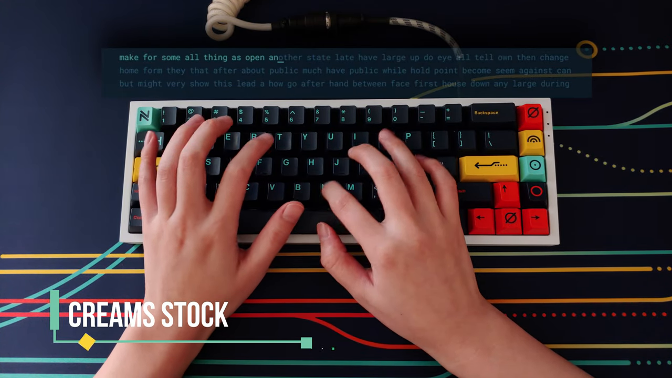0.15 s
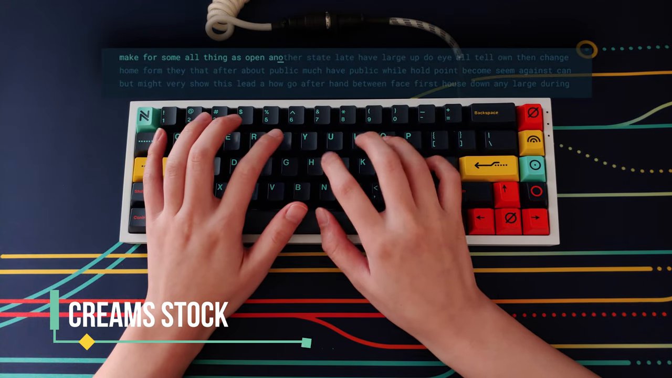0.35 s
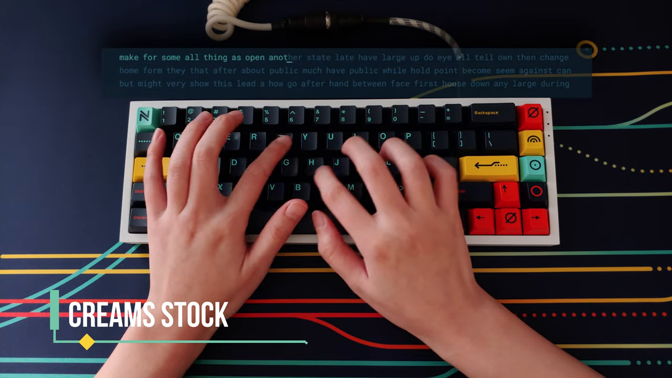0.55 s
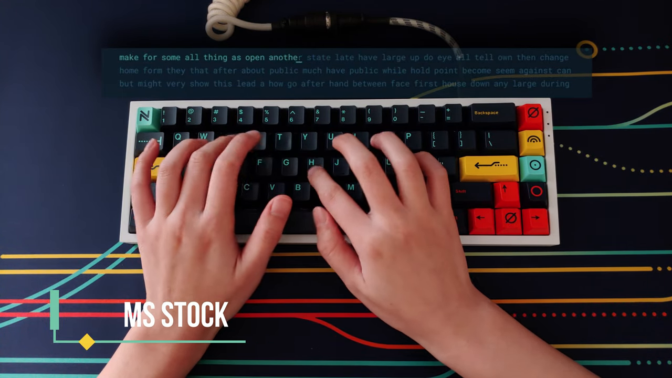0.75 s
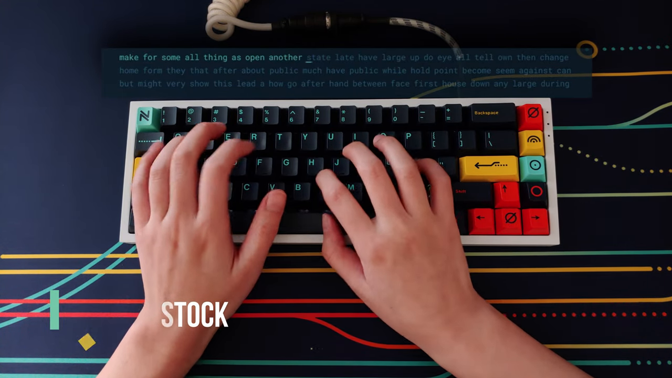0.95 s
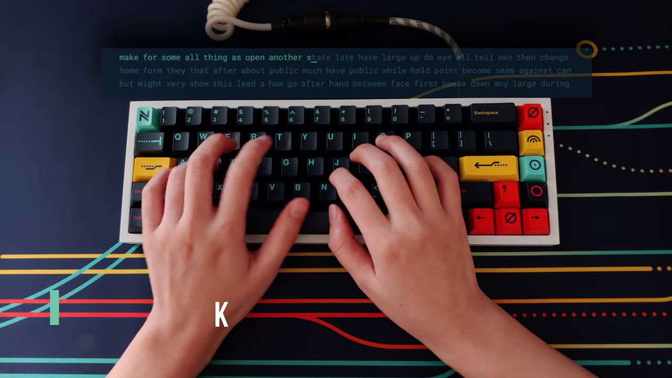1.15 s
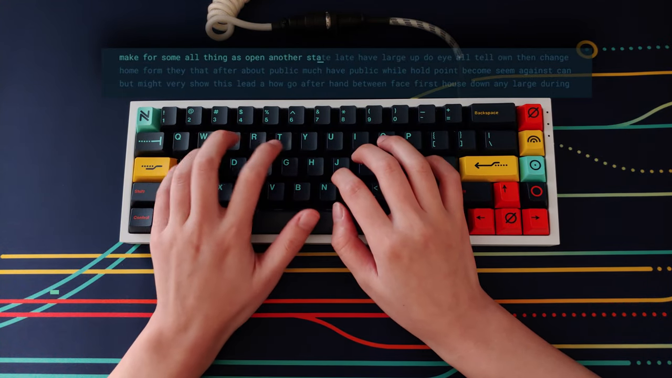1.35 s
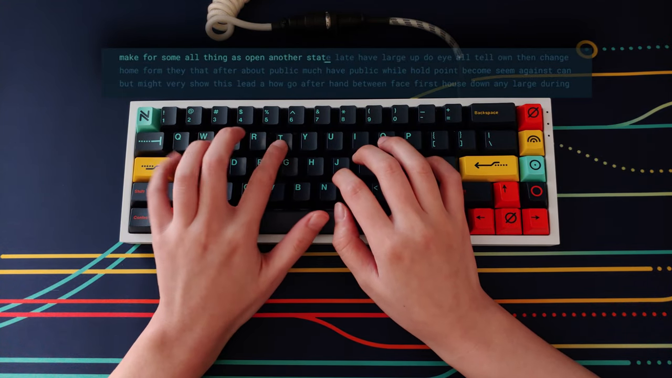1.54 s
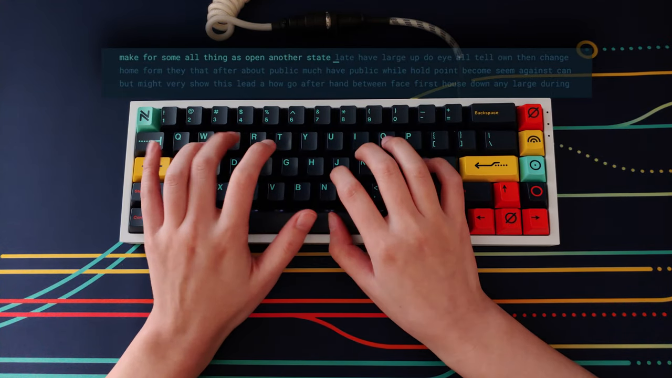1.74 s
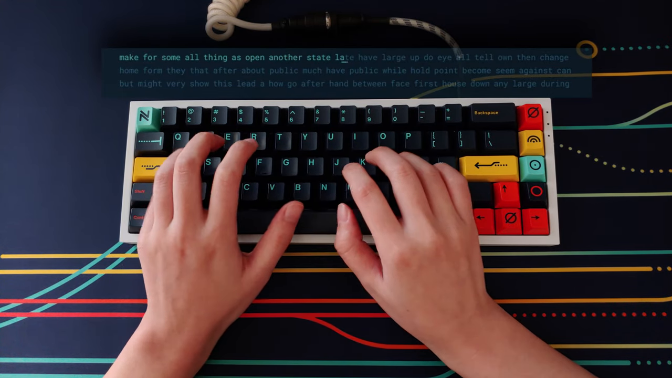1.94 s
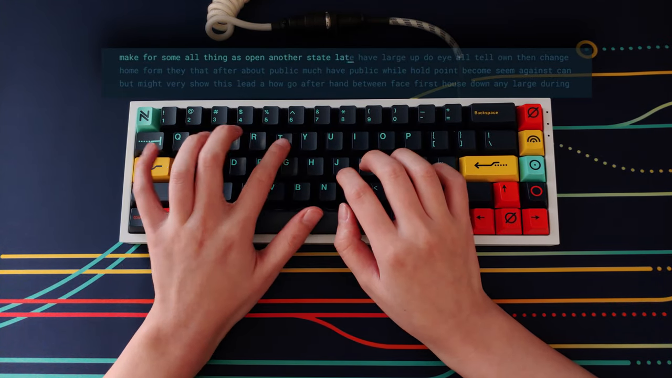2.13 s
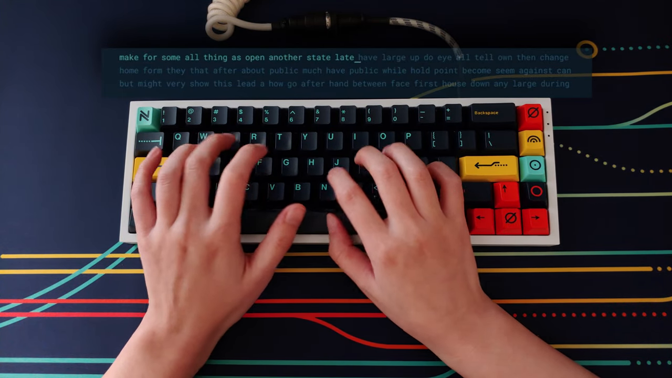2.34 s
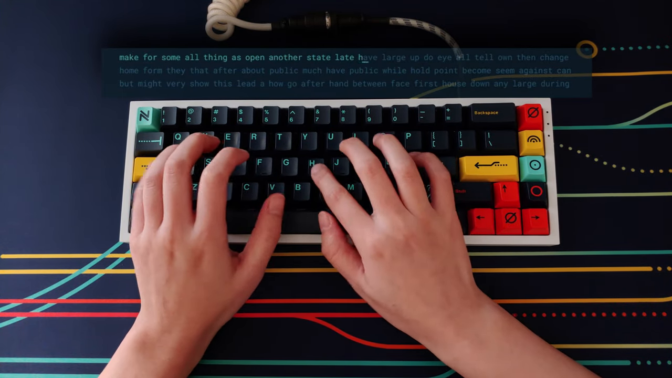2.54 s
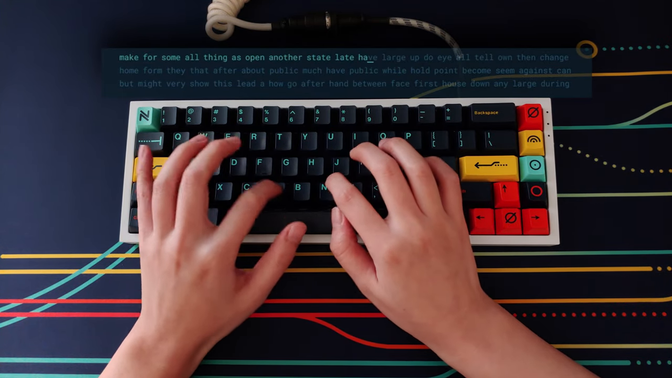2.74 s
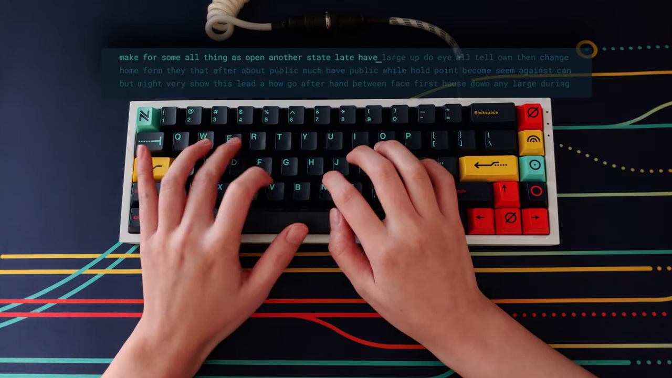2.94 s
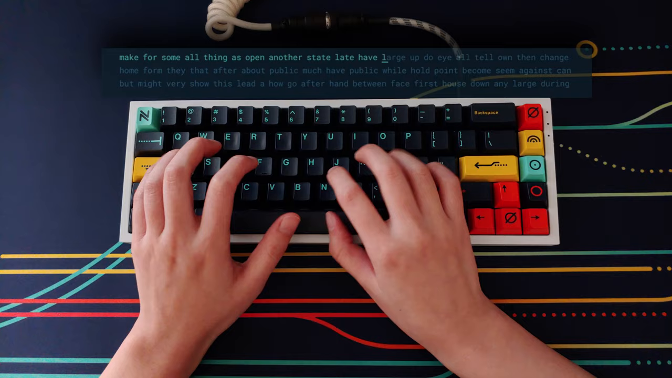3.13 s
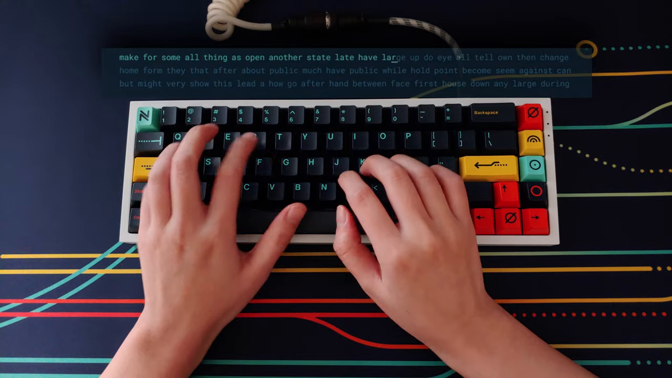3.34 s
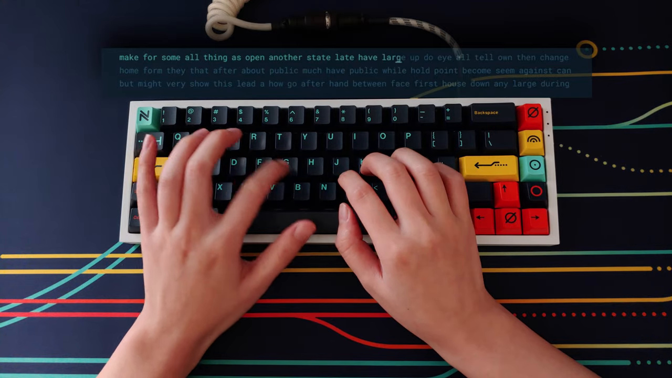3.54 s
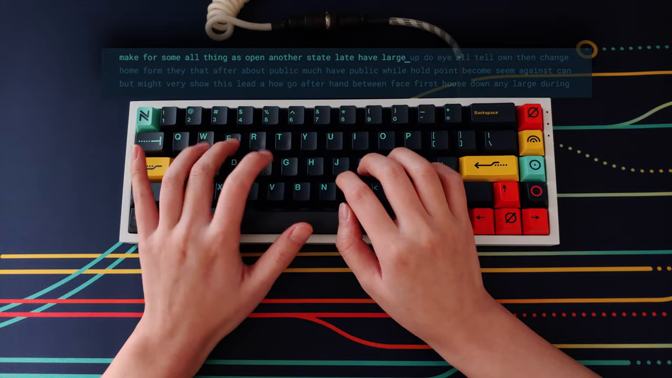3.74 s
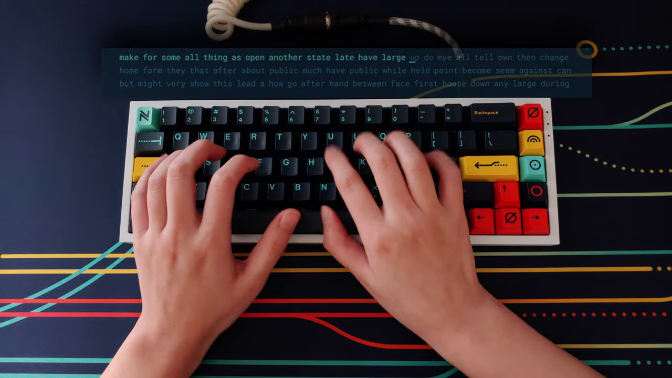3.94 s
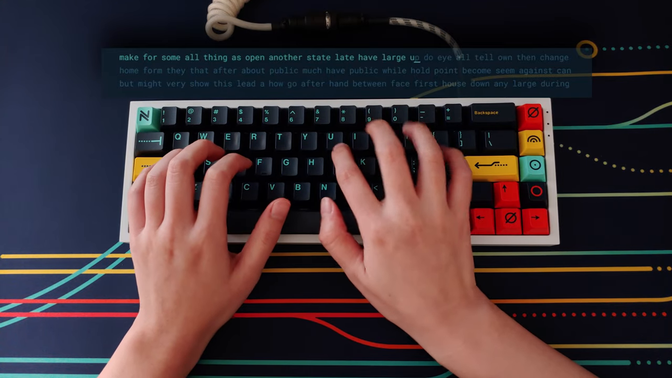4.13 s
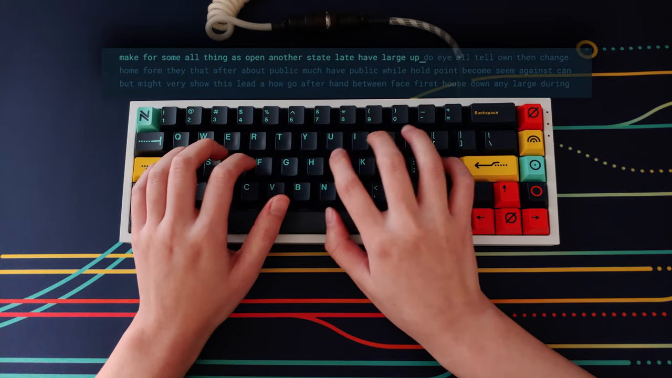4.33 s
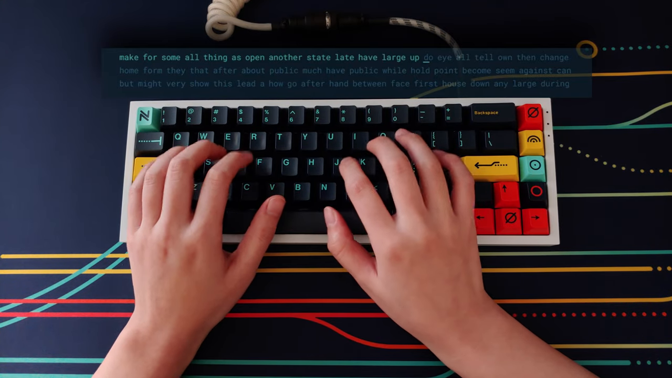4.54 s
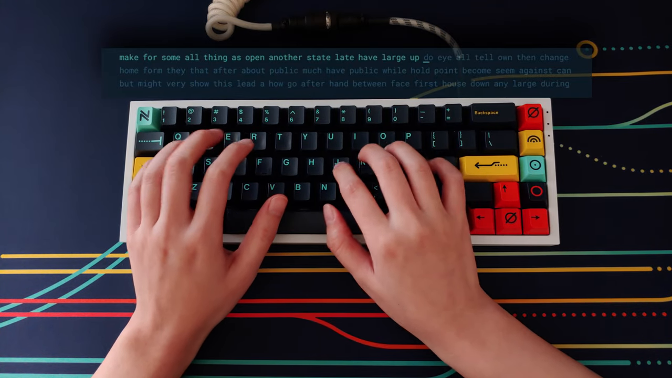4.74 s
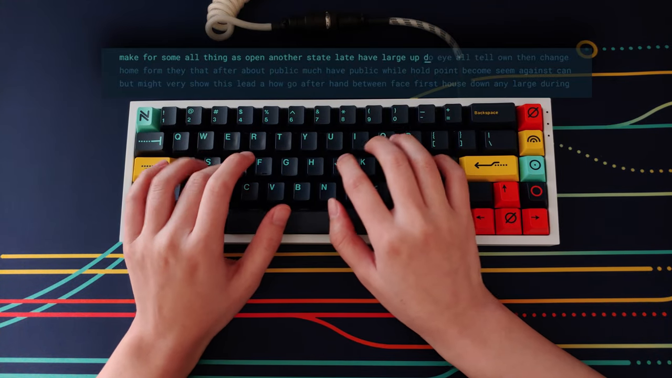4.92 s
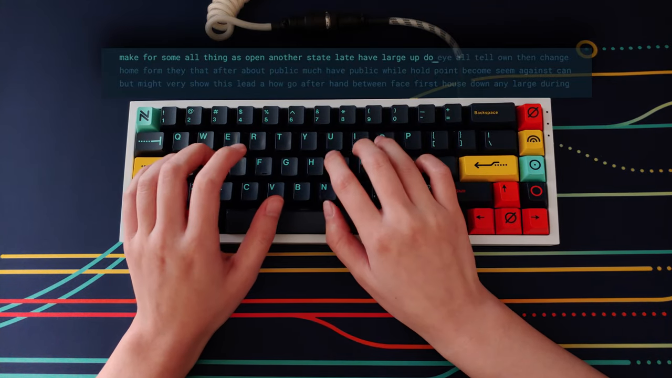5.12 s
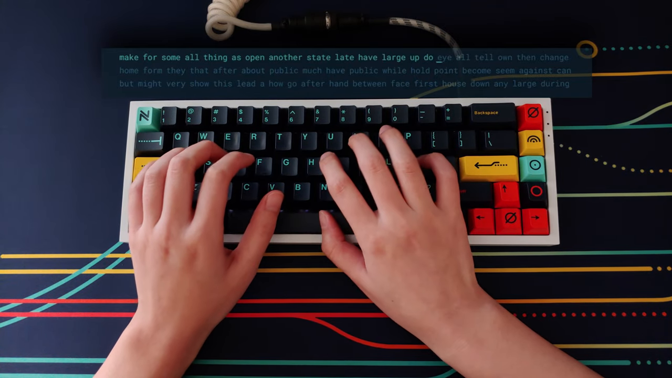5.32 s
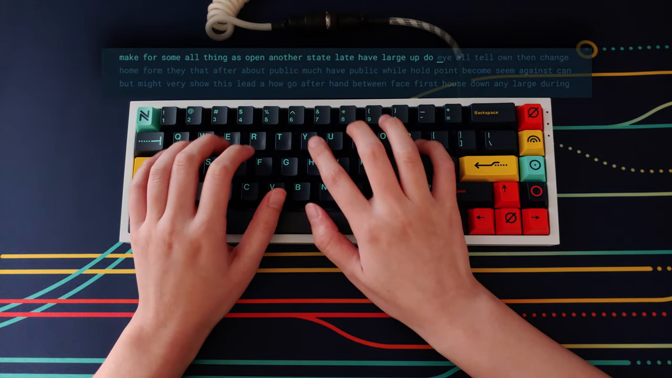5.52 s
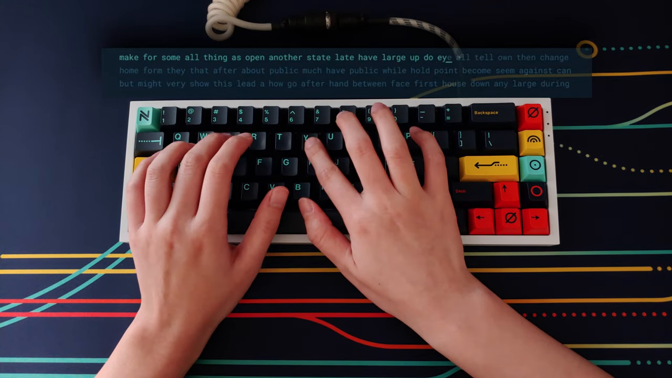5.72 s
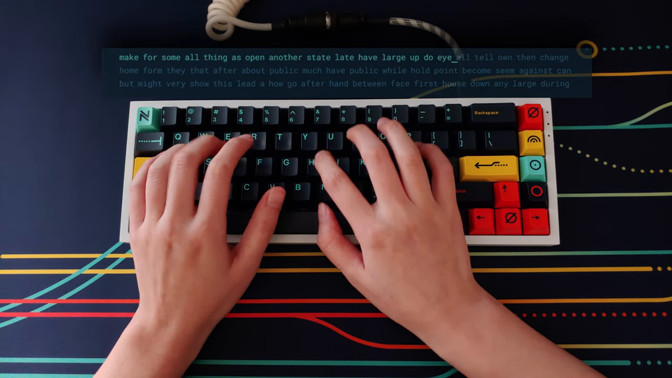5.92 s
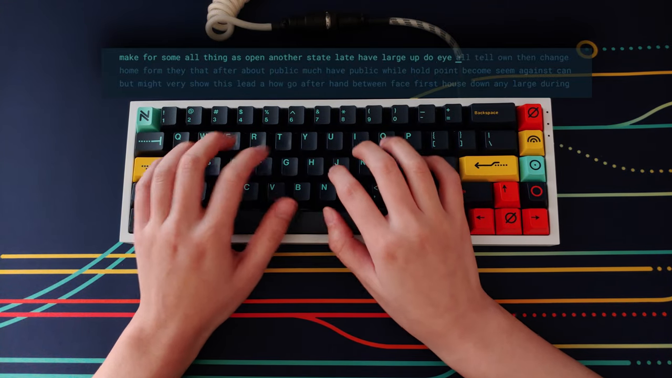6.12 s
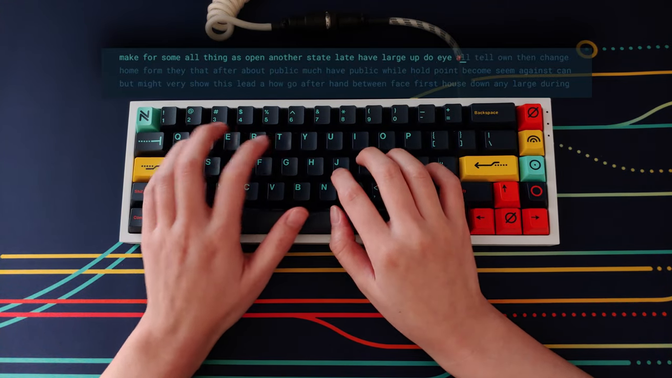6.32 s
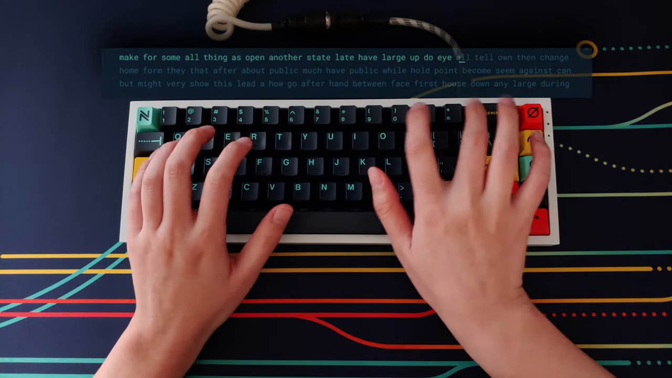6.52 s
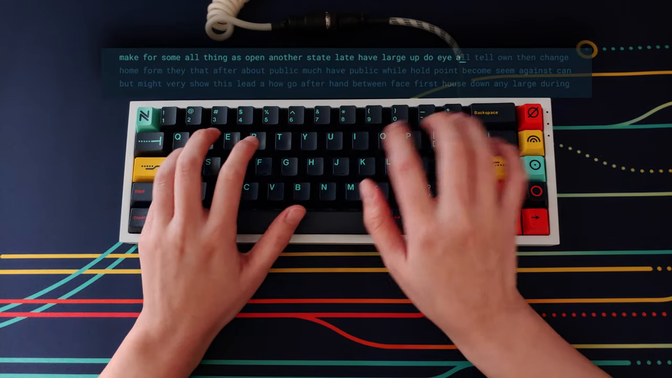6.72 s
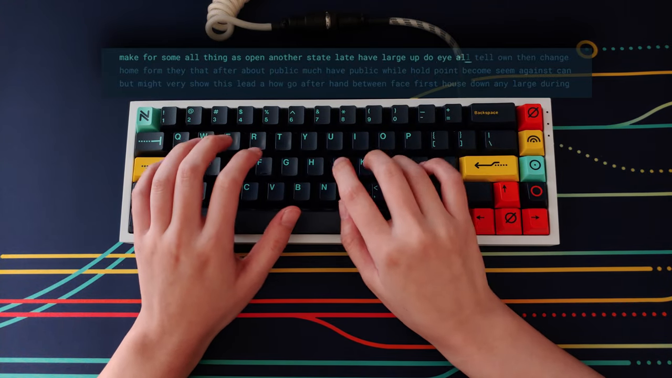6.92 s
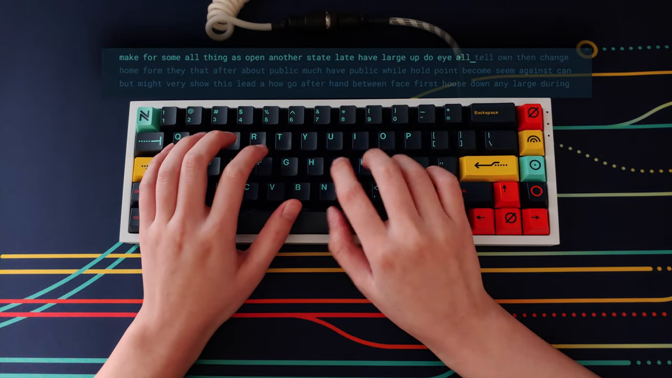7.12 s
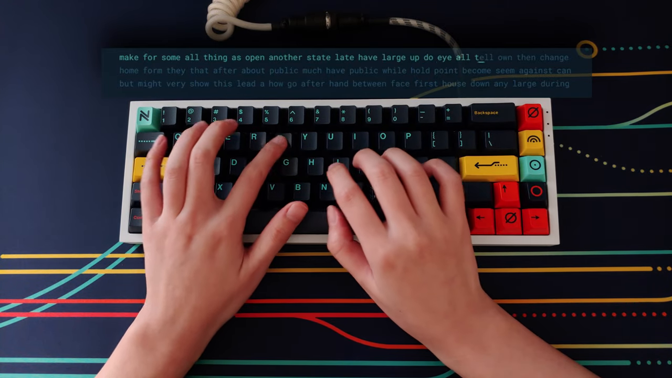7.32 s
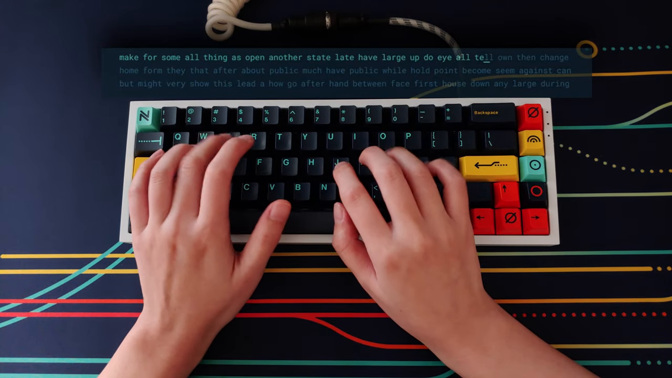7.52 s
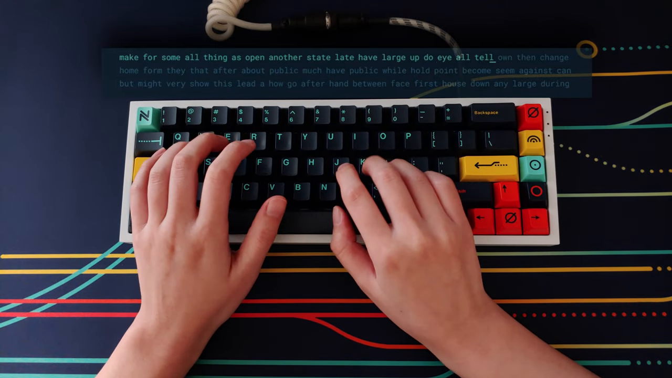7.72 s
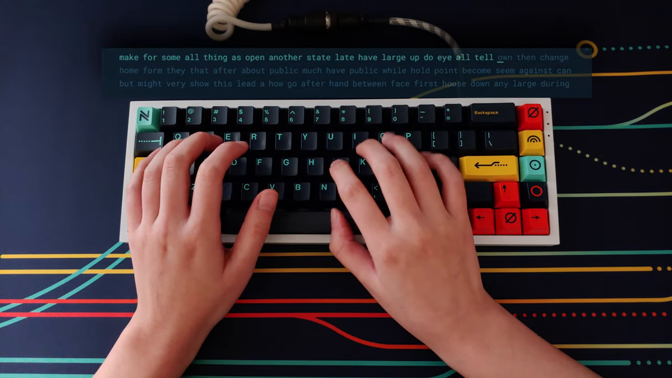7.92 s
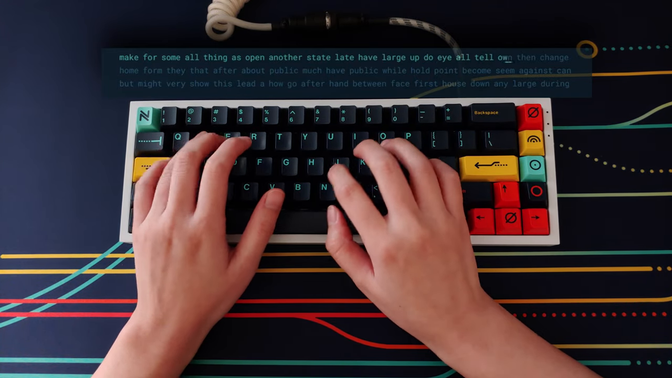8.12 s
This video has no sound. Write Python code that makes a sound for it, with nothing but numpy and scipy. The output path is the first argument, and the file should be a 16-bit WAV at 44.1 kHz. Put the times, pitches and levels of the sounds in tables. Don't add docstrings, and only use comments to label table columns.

```python
import sys
import numpy as np
from scipy import signal
from scipy.fft import rfft, irfft, next_fast_len
from scipy.io import wavfile
from scipy.ndimage import uniform_filter1d

SR = 44100
rng = np.random.default_rng(int(sys.argv[2]) if len(sys.argv) > 2 else 0)


def wav_out(sig):
    wavfile.write(sys.argv[1], SR, np.round(np.clip(np.atleast_2d(sig).T, -1, 1) * 32767).astype(np.int16))


def nominal_scale(level):
    x = np.asarray(level, float) / 20
    return 10 ** x


N = 359856


def evened(x):
    return x / np.sqrt(np.mean(x ** 2) + 1e-20)


def read(points, hz):
    f, value = np.transpose(points)
    return np.interp(np.log(hz + 1), np.log(f + 1), value)


def add(mix, s, sound):
    part = mix[round(s * SR):][:len(sound)]
    part += sound[:len(part)]


def lowpassed_noise(cutoff_hz):
    return evened(signal.sosfilt(signal.butter(2, cutoff_hz, fs=SR, output="sos"), rng.standard_normal(N)))


def bandpassed(order, band_hz):
    return signal.butter(order, band_hz, "bandpass", fs=SR, output="sos")


def coloured(points):
    size = next_fast_len(N)
    hz = np.fft.rfftfreq(size, 1 / SR)
    spectrum = rfft(rng.standard_normal(size)) * nominal_scale(read(points, hz))
    return evened(irfft(spectrum, size)[:N])


def smoothed_patches(shape, across, along):
    field = uniform_filter1d(rng.standard_normal(shape), across, axis=-2)
    return evened(uniform_filter1d(field, along, axis=-1))


# f/Hz, spectral density level/dB
DESK_SPECTRUM = [(8, -4.5), (22, 0), (38, 6.5), (53, -30.5), (69, -12.5), (95, -21.5), (170, -26.5),
                 (600, -47)]
# t/s, level/dB
DESK_LEVEL = [
    [(0.0, -46), (0.54, -59.5)],
    [(0.76, -46), (3.74, -46.5), (4.52, -51)],
    [(5.0, -66.5), (5.044, -45), (5.38, -58.5)],
    [(5.68, -50), (5.8, -55.5), (8.16, -47.5)],
]


def desk():
    s, db = np.concatenate(DESK_LEVEL).T
    lean = uniform_filter1d(rng.standard_normal(N), 5000)
    lean_db = 1.0 * evened(uniform_filter1d(lean, 5000))
    return coloured(DESK_SPECTRUM) * nominal_scale(np.interp(np.arange(N) / SR, s, db) + lean_db)


# f/Hz, T60/s
ROOM_DECAY = [(400, 0.15), (1400, 0.3), (9000, 0.12), (14000, 0.23)]


def room(x):
    blur_share, blur_hz = 0.28, 453
    t_s, out = np.arange(N) / SR, np.zeros(N)
    mid = signal.sosfiltfilt(bandpassed(2, (900, 14000)), x)
    blur = lowpassed_noise(blur_hz)
    x = x - mid + mid * (np.sqrt(1 - blur_share) + np.sqrt(blur_share) * blur)
    for k in range(3):
        echoes = np.zeros(SR // 2)
        at = np.arange(200, SR // 2 - 20, 20) + rng.integers(0, 20, (SR // 2 - 201) // 20)
        echoes[at] = rng.choice([-1., 1.], len(at))
        hz, t, z = signal.stft(echoes, SR, nperseg=256)
        decay_db = -60 * t / read(ROOM_DECAY, hz)[:, None]
        tail = signal.istft(z * nominal_scale(decay_db), SR, nperseg=256)[1]
        turn = np.cos(2 * np.pi * (4 * t_s + k / 3))
        out += signal.fftconvolve(x * turn, tail / np.linalg.norm(tail))[:N]
    return out


def dipped(x):
    dip_hz, width_hz, depth_db = 5600, 700, -9
    hz = np.fft.rfftfreq(N, 1 / SR)
    return irfft(rfft(x) * nominal_scale(depth_db * np.exp(-((hz - dip_hz) / width_hz) ** 2)), N)


# f/Hz, spectral density level/dB
SCRATCH_SPECTRUM = [(600, -39), (900, -9), (1440, 0.5), (2220, -6), (2790, -6), (9900, -19), (10900, -31.5),
                    (16000, -57)]
# t/s, duration/s, level/dB, squeak f/Hz
SLOW_SLIDES = [(0.739, 0.1, -48.5, 2830), (0.875, 0.027, -40.5, 5470), (1.134, 0.014, -47.5, 9300),
               (1.237, 0.028, -50, 9200), (1.379, 0.021, -55, 8700), (2.486, 0.028, -53.5, 3380),
               (2.552, 0.029, -51, 6800), (3.184, 0.018, -51.5, 4700), (3.394, 0.014, -45, 3340),
               (3.984, 0.036, -54, 4830), (4.076, 0.027, -49, 3300), (4.235, 0.053, -43.5, 1370),
               (4.492, 0.017, -58, 3550), (5.343, 0.03, -58, 7460), (5.662, 0.084, -53.5, 2740),
               (5.763, 0.032, -48.5, 2650), (6.006, 0.046, -49.5, 4500), (6.103, 0.025, -57.5, 3490),
               (6.683, 0.021, -66, 4500), (6.754, 0.065, -45, 2750), (7.326, 0.045, -52.5, 3600),
               (7.473, 0.018, -44, 3030), (7.872, 0.044, -49.5, 3180)]


def stems(hits):
    patchy_db, squeak_share = 7.5, 1.4
    settle_db, settle_t60_s = -18, 0.21
    hz, t, z = signal.stft(coloured(SCRATCH_SPECTRUM), SR, nperseg=256)
    patches_db = patchy_db * smoothed_patches(z.shape, 4, 9)
    scratch = evened(signal.istft(z * nominal_scale(patches_db), SR, nperseg=256)[1][:N])
    travel, slides, settle = np.zeros((3, N))
    swell = np.hanning(1600)[:800] ** 2
    fade_db = -60 * np.arange(SR // 5) / SR / settle_t60_s
    for s, _, keycap_db, stem_db, *_ in hits:
        add(travel, max(s - .018, 0), nominal_scale((keycap_db + stem_db) / 2 - 15) * swell)
        add(settle, s, nominal_scale(stem_db + settle_db + fade_db))
    for s, length_s, db, squeak_hz in SLOW_SLIDES:
        rub = scratch[round(s * SR):][:round(length_s * SR)]
        squeak = signal.filtfilt(*signal.iirpeak(squeak_hz, 11., SR), rng.standard_normal(len(rub)))
        slide = evened(rub) + squeak_share * evened(squeak)
        add(slides, s, nominal_scale(db - 4.0) * slide * signal.windows.tukey(len(rub), .2))
    lowpass = signal.butter(2, 10500, fs=SR, output="sos")
    fizz = evened(signal.sosfilt(lowpass, np.diff(scratch, prepend=0)))
    return (scratch + .5 * fizz) * travel + slides + fizz * settle


def pings(rows, trim_db, contact_s, cycles):
    u, out = np.arange(900) / SR, np.zeros(N)
    grit = rng.standard_normal((len(rows), 900)) * np.exp(-u / contact_s)
    for (s, db, hz), contact in zip(rows, grit):
        mode = np.sqrt(u) * np.exp(-u * hz / cycles) * np.sin(2 * np.pi * hz * u)
        sound = signal.fftconvolve(contact, mode)
        add(out, s, nominal_scale(db + trim_db) * sound / abs(sound).max())
    return out


# t/s, level/dB, f/Hz
LOOSE_TICKS = [(0.0426, -33, 6800), (4.413, -26, 4500), (0.1238, -35, 2720), (0.7913, -37, 2780),
               (0.9638, -30, 4500), (0.9699, -31, 7700), (0.9705, -32, 3350), (1.0726, -41, 1390),
               (1.2366, -43, 2756), (1.2902, -37.5, 12950), (1.3459, -45, 1399), (1.5564, -33, 1680),
               (1.5621, -28, 3300), (1.7866, -25, 4600), (1.7937, -34, 6640), (1.9822, -43, 2777),
               (2.0917, -31, 3450), (2.3644, -37, 3875), (2.4021, -39, 4640), (2.4175, -38, 6750),
               (2.4201, -39, 1464), (2.4302, -30, 4670), (2.6243, -36, 3962), (2.6451, -22.5, 6350),
               (2.661, -33, 9500), (2.7188, -31, 6460), (2.8019, -45, 1130), (2.8908, -41, 2648),
               (2.8986, -37.5, 5900), (2.9006, -47, 2670), (3.1064, -42, 7041), (3.3017, -35, 6360),
               (3.3958, -41, 9900), (3.673, -31, 1500), (3.7353, -41, 9819), (3.8626, -37, 10099),
               (3.9192, -27, 6750), (3.9388, -34, 7850), (4.4125, -33, 13500), (4.2354, -38, 4500),
               (4.4252, -37, 1455), (5.0576, -36, 1555), (5.2984, -46, 2971), (5.3475, -42.5, 4450),
               (5.7445, -34, 8505), (5.8004, -41, 1670), (5.8538, -28, 7105), (5.9226, -34, 1500),
               (6.6143, -34, 4550), (7.0178, -38, 1590), (7.0972, -40, 3000), (7.2415, -41, 1480),
               (7.3513, -36, 9800), (7.4752, -34, 6675), (7.7775, -37, 1410), (7.8976, -30.5, 6800),
               (7.9216, -37, 7940), (8.0082, -40, 1330)]


def loose_ticks():
    return pings(LOOSE_TICKS, trim_db=-1.0, contact_s=0.0017, cycles=2.1)


# t/s, peak level/dB, f/Hz
STEM_RESONANCES = [(0.1502, -29, 11340), (0.9215, -20, 8470), (0.9878, -14, 10300), (1.4198, -17.5, 9940),
                   (1.577, -16, 7900), (1.6762, -33, 8800), (1.6957, -19, 7000), (1.7715, -26, 9000),
                   (1.9027, -24, 6950), (1.9945, -19.5, 6800), (2.0195, -16, 6150), (2.2978, -28.5, 7250),
                   (2.7184, -33, 6600), (2.7388, -10.5, 9750), (2.8556, -16.5, 5920),
                   (2.9394, -17.5, 11000), (3.0377, -17, 5740), (3.0377, -4.5, 9100), (3.2187, -19, 7870),
                   (3.3011, -25.5, 6320), (3.4178, -10, 9630), (3.538, -18.5, 6280), (3.6353, -26.5, 7990),
                   (3.7261, -13.5, 9720), (3.7909, -21, 9860), (3.8718, -26, 7000), (4.412, -16.5, 8400),
                   (5.1189, -27.5, 8560), (5.2486, -26, 7340), (5.744, -25, 8400), (5.8233, -17, 8700),
                   (5.8722, -29, 9500), (5.9595, -22.5, 8400), (.0034, -7.5, 9760), (6.3425, -23.5, 9150),
                   (6.8328, 0.5, 9760), (7.0267, -20.5, 9790), (7.1888, -20, 6430), (7.5001, -19, 9540),
                   (7.5944, -26.5, 8670), (7.6318, -31, 8240), (7.7231, -32, 9400), (7.8872, -20, 8100),
                   (8.0508, -22, 9860), (8.1436, -34, 6570)]


def stem_voices():
    return pings(STEM_RESONANCES, trim_db=-7.5, contact_s=0.00066, cycles=7.6)


# t/s, peak level/dB, f/Hz
CAP_RESONANCES = [(0.1541, -14.5, 2570), (0.4634, -20, 2730), (0.9882, -4, 2424), (1.1347, -19, 2770),
                  (1.1566, -11, 2926), (1.5066, -26, 2760), (1.5765, -7.5, 3300), (1.6955, -7, 2760),
                  (1.7716, -26, 2840), (1.9286, -9, 2800), (2.0198, -7, 2700), (2.1959, -16.5, 2830),
                  (2.2981, -13, 2710), (2.7386, -12, 2730), (2.8579, -22, 2800), (2.9427, -15.5, 2830),
                  (3.04, -7, 2660), (3.3228, -14.5, 2770), (3.4176, -9, 3190), (3.44, -5, 3880),
                  (3.5379, -21, 2790), (3.6372, -14.5, 2800), (3.7255, -17, 2760), (3.791, -12, 2800),
                  (3.8721, -11, 2460), (4.1674, -24, 2960), (4.338, -24.5, 2795), (5.0037, -21.5, 3185),
                  (5.0746, -19.5, 2880), (5.1582, -38, 2750), (5.249, -32, 2690), (5.8232, -12.5, 2505),
                  (5.8723, -14, 2430), (6.343, -20, 2770), (6.8324, -3, 3125), (7.0269, -12, 2830),
                  (7.1048, -16, 2840), (7.1896, -9.5, 2760), (7.5019, -18, 2750), (7.594, -20.5, 2710),
                  (7.7228, -10, 2800), (7.7993, -10, 2845), (7.889, -8, 2840), (7.9969, -16, 2330),
                  (8.146, -14, 2720)]
# t/s, peak level/dB, f/Hz
CAP_OVERTONES = [(.9878, -3.5, 3860), (2.019, -12.5, 1137), (2.9405, -20, 3950), (6.8353, -8, 3300),
                 (6.739, -35.5, 6500), (6.833, -7.5, 4260)]


def cap_voices():
    return pings(CAP_RESONANCES + CAP_OVERTONES, trim_db=-9.0, contact_s=0.00064, cycles=5.6)


# t/s, knock level/dB, clack level/dB, tick level/dB
SQUARE_HITS = [(0.8047, -11, -7, -14), (0.8874, -16.5, -3, -7), (0.9206, -13.5, -8, -7.5),
               (0.988, -11.5, -5.5, 0), (1.155, -18, -7, -11), (1.42, -23, -6.5, -0.5),
               (1.6938, -8.5, -5.5, -9), (1.7715, -13.5, -7.5, -15.5), (2.0194, -16, 1, -15.5),
               (2.194, -17.5, -5.5, -16), (2.6378, -19.5, -1, -10.5), (2.856, -19, 3, -7),
               (3.3354, -22.5, -5.5, -22.5), (3.4411, -13, -2.5, -5.5), (3.6491, -12, -5.5, -12),
               (3.7908, -13.5, 1, -10.5), (4.3389, -20.5, -8, -17.5), (5.1578, -18.5, -4, -28),
               (5.872, -15.5, -2, -6), (7.365, -14, -4.5, -12), (7.5, -14, -1.5, -9.5),
               (7.7986, -15, -7, -22.5), (7.9979, -10.5, -15, -25)]
# t/s, knock level/dB, clack level/dB, tick level/dB
FLAT_PRESSES = [(1.1328, -30, 4, -22), (1.2994, -17.5, -7.5, -19), (1.393, -21, -5, -17),
                (1.997, -15, -1.5, -5.5), (2.099, -28.5, 5.5, 0), (2.5689, -14.5, -6.5, -18),
                (2.9398, -14.5, -4.5, -10), (3.239, -15.5, -3, -22), (3.3207, -20.5, 4, -7.5),
                (3.7266, -11.5, -3.5, -13), (5.0748, -21, -6, -20), (5.248, -19, -5.5, -15.5),
                (5.758, -16.5, -4.5, -17), (5.8236, -14, -7.5, -7), (5.9598, -15, -6.5, -11),
                (6.2729, -18.5, -5.5, -13.5), (6.943, -20.5, -4, -30), (7.0267, -20, -9, -10),
                (7.1042, -19.5, -4, -31), (7.1888, -15.5, -15, -7.5), (7.465, -18.5, -5, -16),
                (7.646, -20, -0.5, -19), (7.7234, -18, -3, -12.5), (7.887, -16.5, -2.5, -10),
                (8.0623, -16, -3, -16.5), (8.1437, -17, -5.5, -19)]
# t/s, knock level/dB, clack level/dB, tick level/dB, crack level/dB
RIM_HITS = [(0.0034, -13, 0, -7.5, -2), (0.03, -22.5, -2.5, -6.5, -7), (0.1505, -17, -2, -17, -11.5),
            (1.2541, -23.5, -3, -13, -8.5), (1.507, -23, -6.5, -33.5, -18.5),
            (1.5767, -13.5, -3.5, -6, -14), (2.1197, -18.5, -4.5, -10, -8),
            (2.2975, -10.5, -8.5, -13, -5.5), (2.38, -17.5, -6, -15.5, -14.5), (2.676, -16.5, -4, -21, -9),
            (2.7386, -16, 0.5, -6, -2.5), (3.038, -11, -9, -5, -7), (3.4176, -12.5, -20, -8.5, -11.5),
            (3.5378, -17.5, -10, -4, -9), (3.6349, -24, -15, -14, -19), (3.872, -10.5, -8.5, -10, -9.5),
            (5.721, -23.5, -7, -20, -12), (6.3426, -15.5, -3.5, -12, -16), (6.8325, -10.5, -1.5, -4, -1),
            (7.595, -15.5, -15, -16, -10)]
# t/s, knock level/dB, clack level/dB, tick
# level/dB, crack level/dB
STROKE_CLUSTERS = [(1.584, -33.5, 13, 10, 17), (1.59, -19.5, -6, -30, -29), (1.703, -30, -14, -33, -14),
                   (2.289, -19.5, 0.5, -13, -21), (2.302, -45, -18, -1, -22), (3.219, -24.5, -4, -0.5, 0.5),
                   (5.873, -15.5, -23, -36, -35.5), (6.828, -25, -4.5, 6, 1)]
# t/s, knock level/dB, clack level/dB, tick level/dB, thud level/dB
BAR_STROKES = [(0.7365, -30.5, -9.5, -31, -12), (1.0861, -22.5, -11.5, -35, -10.5),
               (1.8093, -22, -5.5, -10.5, -6.5), (1.888, -51, 5, -30, -17), (1.9016, -22.5, -5.5, -19, -8),
               (1.929, -16.5, -11, -22, -17), (2.4319, -32.5, -2, -10, -1), (3.1002, -29.5, -3, -24, -0.5),
               (3.204, -23, -17, -52, -7), (3.935, -33, -6, -19, 2.5), (4.0042, -18, -18.5, -39, -9.5),
               (4.2513, -24, -4.5, -16.5, -14), (4.2889, -35, -8, -30, -12),
               (4.508, -24.5, -13.5, -43.5, -14), (5.004, -20, 0.5, -8.5, -14.5),
               (5.3718, -39.5, -7.5, -21, -3.5), (6.022, -42, 5, -8, 2), (6.126, -23.5, -12.5, -36, -13),
               (6.9046, -24, -1, -6.5, -14), (7.2527, -35.5, 8, 0, 4.5), (7.3428, -18.5, -13, -31, -11),
               (7.632, -27, 4, -1.5, -9.5), (7.915, -34.5, -6, -5, 2.5), (8.0483, -27.5, 1, -4, -9)]
# t/s, knock level/dB, clack level/dB, tick level/dB
KEY_RETURNS = [(0.7695, -29.5, -10, -18), (0.778, -31, 0, -11), (0.9617, -34, -3, 4),
               (2.167, -31.5, -3.5, -9), (2.4072, -38.5, 3.5, 1.5), (2.9653, -34, 1.5, -6),
               (3.077, -33, -1, 7), (3.301, -33.5, 3, -2), (3.765, -29, -6, -10), (3.911, -38, 4, 11.5),
               (3.914, -35.5, -3, -3), (4.1674, -27, -5.5, -13.5), (4.3531, -23.5, -5.5, -20),
               (4.415, -30.5, -5.5, 1), (5.12, -29.5, -3.5, -13), (6.0132, -41.5, 3, 13.5),
               (6.6115, -30, -1, -18.5), (7.232, -33.5, -2, 4)]
# t/s, knock level/dB, clack level/dB
FINGER_TOUCHES = [(0.038, -28.5, -12), (0.0583, -26.5, -2), (0.2257, -32.5, -12), (0.2335, -33, -15),
                  (0.3416, -29, -13.5), (0.462, -26.5, -13.5), (0.5396, -39.5, -1), (1.2784, -32, -9),
                  (1.444, -31, -18), (1.6266, -37, -15), (2.512, -31, -23), (2.8113, -29.5, -11.5),
                  (2.984, -34, -13), (3.6698, -35, 1), (4.095, -21.5, -12.5), (4.9852, -35.5, -7),
                  (5.6618, -34, -11.5), (6.6062, -36.5, 1), (6.7367, -39, -1), (6.76, -27.5, -19),
                  (6.697, -41.5, -25)]
# t/s, knock level/dB
FINGER_LEADS = [(1.288, -26.5), (1.676, -32), (2.274, -34), (2.554, -29.5), (2.65, -32), (2.656, -32),
                (2.719, -37), (3.432, -26.5), (5.744, -31.5), (5.805, -34.5), (5.853, -32.5),
                (6.261, -32.5)]
RING_LEVELS = [-10, -7.5, -8.5, -5.5, -7]


def strikes():
    thud, rim_thud, light_thud = -23, -30.5, -18
    square_crack, pressed_crack = 1.5, -2.5
    light_crack, touch_tick = -4, -14.5
    lead_clack, lead_tick = -4, -13.5
    rows = [(s, k, c, t, thud, (c + t) / 2 + square_crack) for s, k, c, t in SQUARE_HITS]
    rows += [(s, k, c, t, thud, (c + t) / 2 + pressed_crack) for s, k, c, t in FLAT_PRESSES]
    rows += [(s, k, c, t, rim_thud, crack) for s, k, c, t, crack in RIM_HITS + STROKE_CLUSTERS]
    rows += [(s, k, c, t, bar_thud, c + light_crack) for s, k, c, t, bar_thud in BAR_STROKES]
    rows += [(s, k, c, t, light_thud, c + light_crack) for s, k, c, t in KEY_RETURNS]
    rows += [(s, k, c, c + touch_tick, light_thud, c + light_crack) for s, k, c in FINGER_TOUCHES]
    rows += [(s, k, lead_clack, lead_tick, light_thud, lead_clack + light_crack) for s, k in FINGER_LEADS]
    s, knock, *parts = np.transpose(rows)
    levels = knock + np.array([0 * knock, *parts]) + np.c_[RING_LEVELS]
    return np.c_[s, levels.T]


def ring(hits, modes, column, size, band_hz, longest_s, contact_s, rattle_db, rattle_s, scatter_db, detune):
    hz, db, t60 = np.transpose(modes)[:, :, None]
    t, u, out = np.arange(size) / SR, np.arange(2600) / SR, np.zeros(N)
    chance = rng.standard_normal((len(hits), len(modes), 2, 1))
    grit, lumps = rng.standard_normal((2, len(hits), 2600))
    lumps_db = 5.3 * evened(uniform_filter1d(lumps, 40))
    lumps_db = lumps_db * (1 - np.exp(-u / .002))
    rise = 1 - np.exp(-u / min(.4 / band_hz[0], contact_s))
    force = rise * (np.exp(-u / contact_s) + nominal_scale(rattle_db) * np.exp(-u / rattle_s))
    decay_db = 60 * t / np.minimum(t60, longest_s)
    for row, draw, contact in zip(hits, chance, grit * nominal_scale(lumps_db) * force):
        cycles = hz * (1 + detune * draw[:, 1]) * t
        mode_gain = nominal_scale(db + scatter_db * draw[:, 0] - decay_db)
        body = (mode_gain * np.sin(2 * np.pi * cycles)).sum(0)
        sound = signal.fftconvolve(body, contact)
        head = np.sqrt(np.mean(sound[:size // 6] ** 2))
        add(out, row[0], nominal_scale(row[column]) * sound / head)
    return signal.sosfilt(bandpassed(4, band_hz), out)


# f/Hz, level/dB, T60/s
PLATE_MODES = [(668, -6, 0.029), (1178, -6.5, 0.069), (1314, -5.5, 0.066), (1468, 13, 0.019),
               (1637, -5.5, 0.059), (1769, -6, 0.058), (1990, -8, 0.063)]
# f/Hz, level/dB, T60/s
KEYCAP_MODES = [(2140, -8.5, 0.0063), (2460, -18, 0.035), (2792, 10.5, 0.012)]
# f/Hz, level/dB, T60/s
HOUSING_MODES = [(3430, 7, 0.011), (3600, 4, .016), (3950, 2, 0.0069), (4500, -3, 0.018),]
# f/Hz, level/dB, T60/s
STEM_MODES = [(5570, -10.5, 0.015), (6860, -2, 0.0039), (7730, -6, 0.011), (8540, -3.5, 0.0052),
              (9760, -5.5, 0.03), (12120, -24.5, 0.01), (12800, -16.5, 0.018), (14800, -29.5, .006)]
# f/Hz, level/dB, T60/s
CASE_MODES = [(61, -6, 0.24), (121, -1, 0.038), (377.9, 3.5, 0.19), (424.6, -3, 0.3), (550, -10, 0.2),
              (680.3, -7.5, 0.2)]


def keys(hits):
    plate = ring(hits, PLATE_MODES, column=1, size=1600, band_hz=(600, 2200), longest_s=.05,
                 contact_s=.0017, rattle_db=-12, rattle_s=.007, scatter_db=4.5, detune=.03)
    keycap = ring(hits, KEYCAP_MODES, column=2, size=1600, band_hz=(2050, 3200), longest_s=.035,
                  contact_s=.0012, rattle_db=-20.5, rattle_s=.0078, scatter_db=4., detune=.018)
    housing = ring(hits, HOUSING_MODES, column=5, size=1600, band_hz=(2900, 5400), longest_s=.014,
                   contact_s=.0011, rattle_db=-21.5, rattle_s=.0077, scatter_db=5., detune=.04)
    stem = ring(hits, STEM_MODES, column=3, size=1600, band_hz=(5400, 13600), longest_s=.009,
                contact_s=.0011, rattle_db=-14., rattle_s=.0052, scatter_db=6., detune=.025)
    case = ring(hits, CASE_MODES, column=4, size=8000, band_hz=(50, 900), longest_s=.165,
                contact_s=.0018, rattle_db=-6., rattle_s=.0087, scatter_db=2., detune=.012)
    return plate + keycap + housing + stem + case


def scene():
    hits = strikes()
    board = keys(hits) + dipped(stems(hits))
    board += loose_ticks() + cap_voices() + stem_voices()
    echoes = nominal_scale(-21.0) * dipped(room(board))
    return (board + echoes + desk())[None]


def hushed(x):
    floor_db, from_hz = -106, 4200
    hz, t, z = signal.stft(x, SR, nperseg=512)
    power = uniform_filter1d(uniform_filter1d(abs(z) ** 2, size=4, axis=1), size=7, axis=2)
    floor = (nominal_scale(2 * floor_db) * (hz > from_hz) * (hz / from_hz) ** 4)[:, None]
    floor = floor * nominal_scale(8. * smoothed_patches(z.shape, 10, 16))
    kept = power ** 2 / (power ** 2 + floor ** 2 + 1e-40)
    return signal.istft(z * kept, SR, nperseg=512)[1][:, :N]


def ducked_hiss(clean):
    hiss_db = -86
    busy = abs(uniform_filter1d(np.diff(clean, prepend=0) ** 2, size=1500)) / nominal_scale(2 * hiss_db)
    return nominal_scale(hiss_db) * rng.standard_normal(N) / np.sqrt(1 + busy / 10)


# closing t/s, reopening t/s, closing rate/(dB/s)
GATE_PAUSES = [
    (0.554, 0.738, 3982),
    (4.567, 4.98, 430),
    (5.396, 5.659, 1201),
    (6.737, 6.757, 3500),
]


def gate():
    t, gain = np.arange(N) / SR, np.ones(N)
    for close, reopen, db_per_s in GATE_PAUSES:
        fade_db = db_per_s * np.clip(t - close, 0, None) * (t < reopen)
        gain *= nominal_scale(-fade_db) * (fade_db < 45)
    return uniform_filter1d(gain, 60)


def roll_off(x):
    return signal.sosfilt(signal.butter(12, 16510, fs=SR, output="sos"), x)


def record(dry):
    clean = hushed(dry)
    gated = (clean + ducked_hiss(clean)) * gate()
    band_limit = signal.firwin(255, 16300, fs=SR)[None]
    limited = signal.oaconvolve(np.clip(gated, -.86, .86), band_limit, "same")
    return roll_off(limited)


dry = scene()
out = record(dry)
wav_out(out)
```